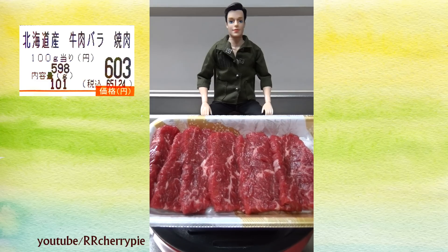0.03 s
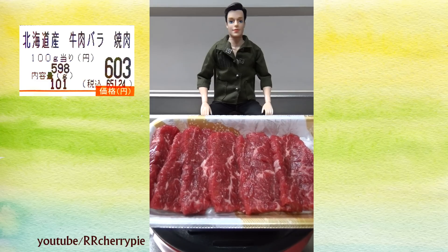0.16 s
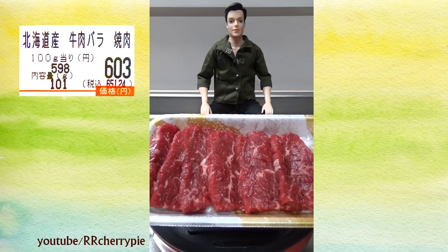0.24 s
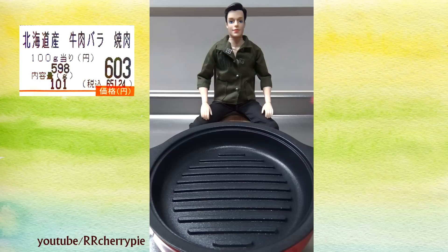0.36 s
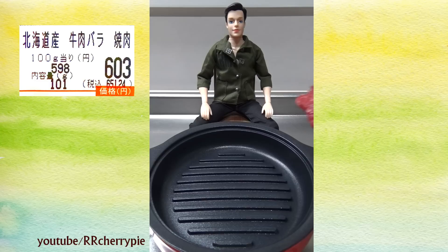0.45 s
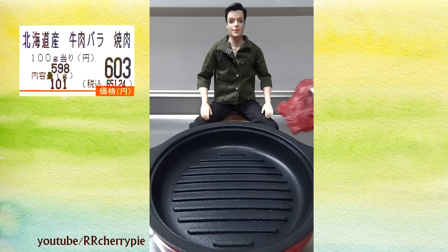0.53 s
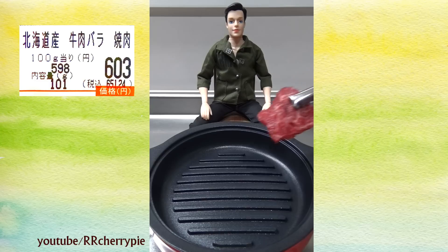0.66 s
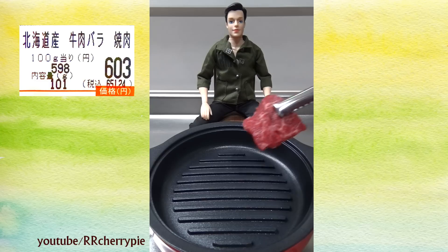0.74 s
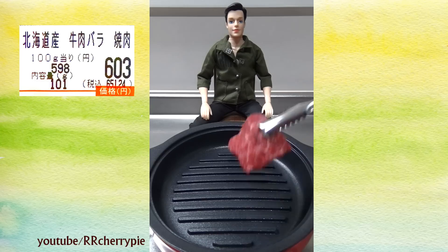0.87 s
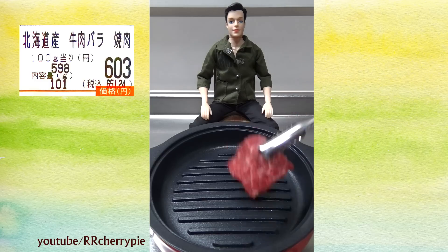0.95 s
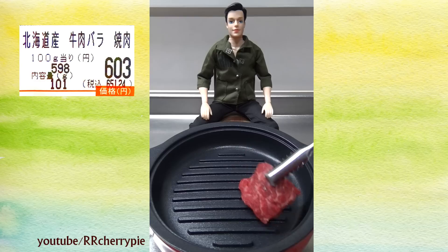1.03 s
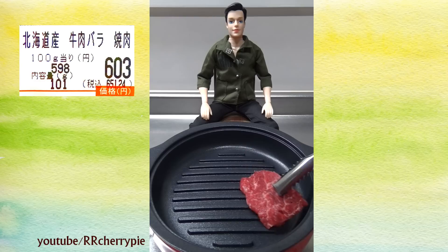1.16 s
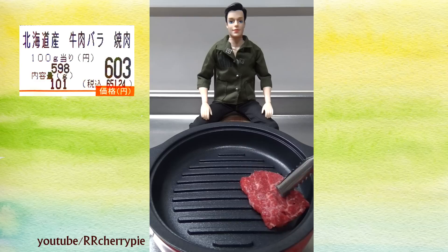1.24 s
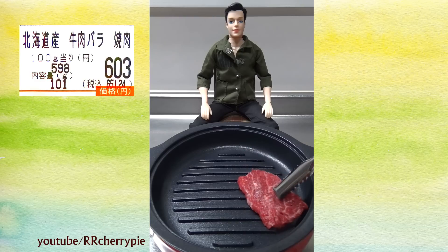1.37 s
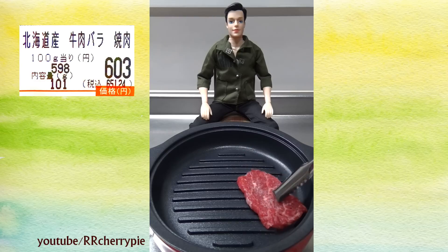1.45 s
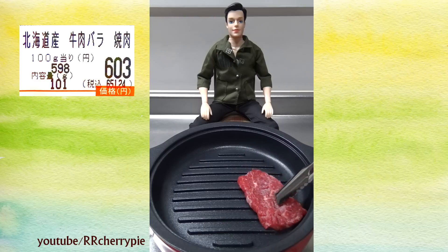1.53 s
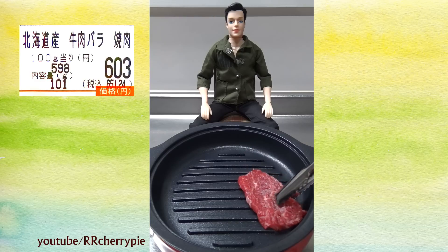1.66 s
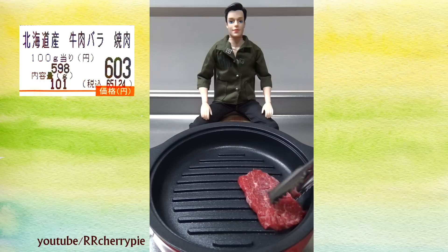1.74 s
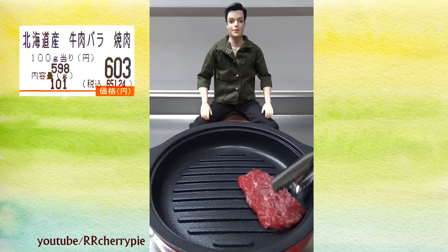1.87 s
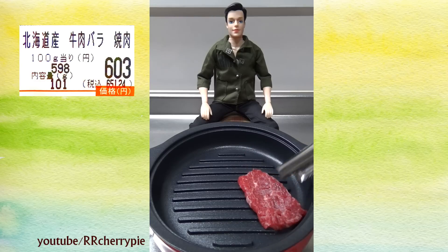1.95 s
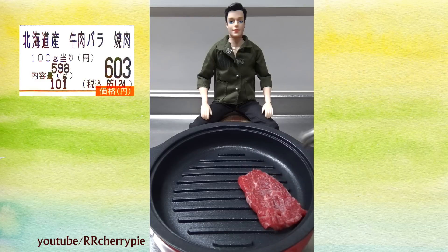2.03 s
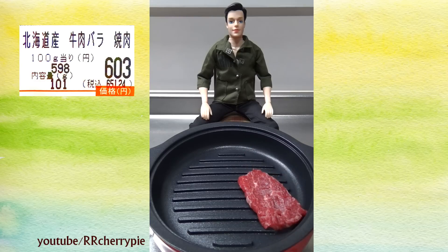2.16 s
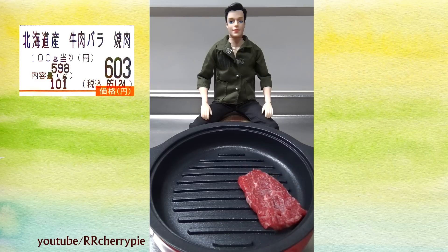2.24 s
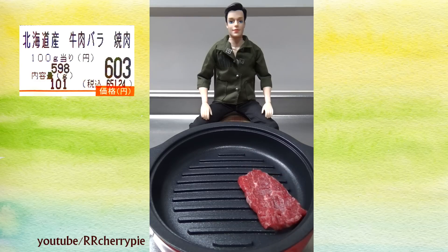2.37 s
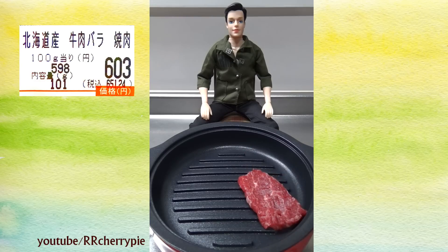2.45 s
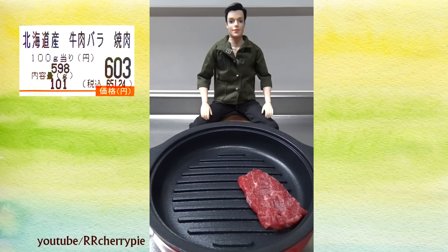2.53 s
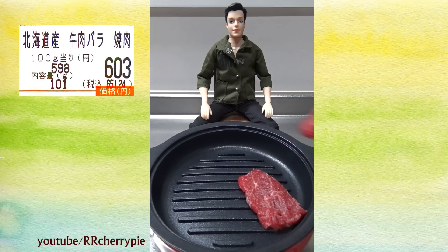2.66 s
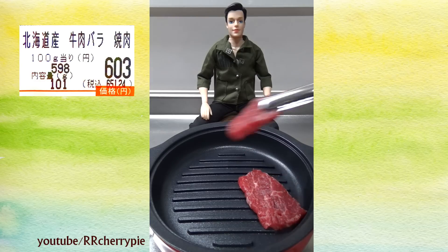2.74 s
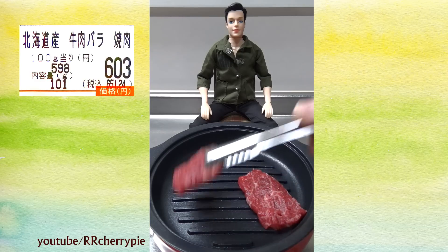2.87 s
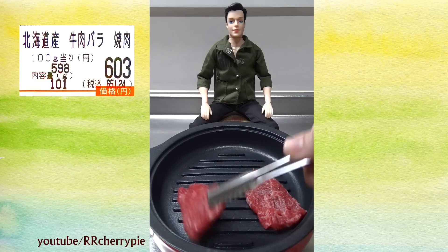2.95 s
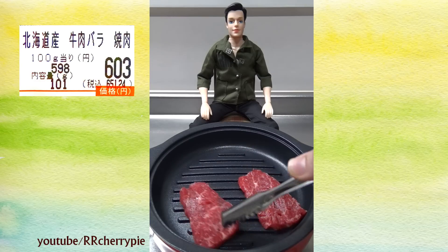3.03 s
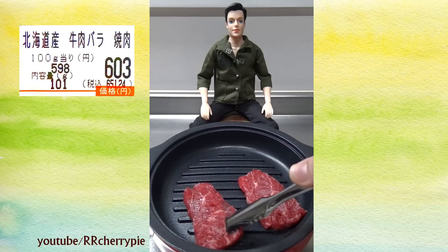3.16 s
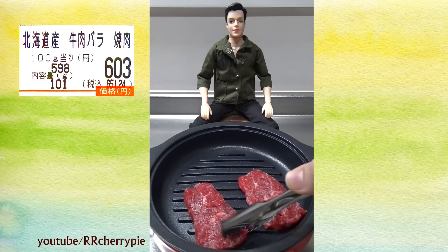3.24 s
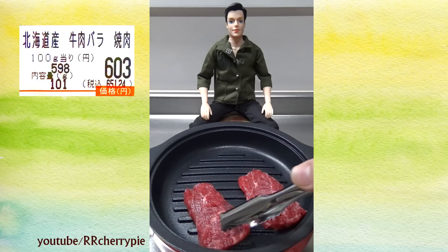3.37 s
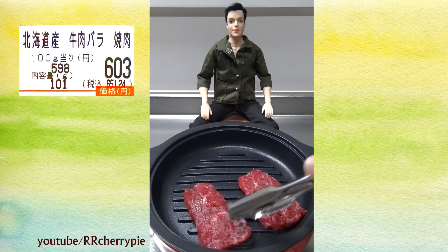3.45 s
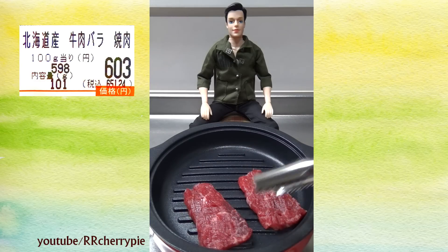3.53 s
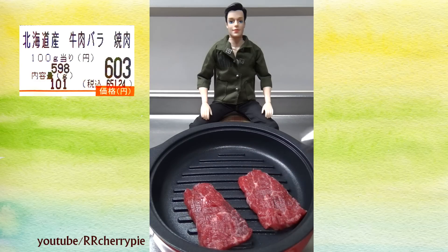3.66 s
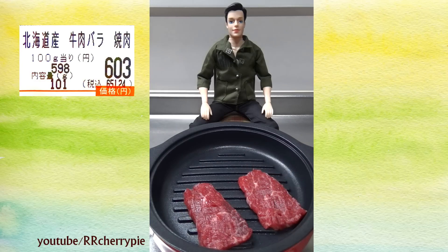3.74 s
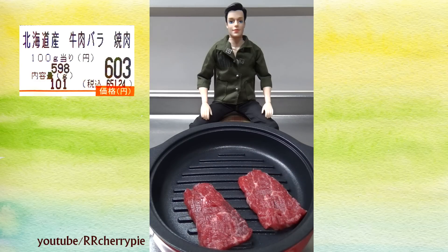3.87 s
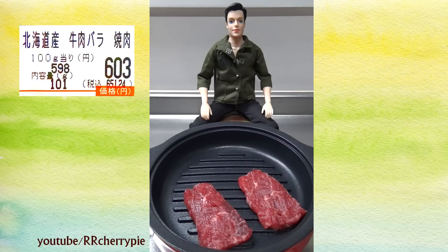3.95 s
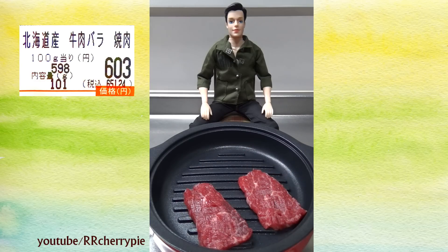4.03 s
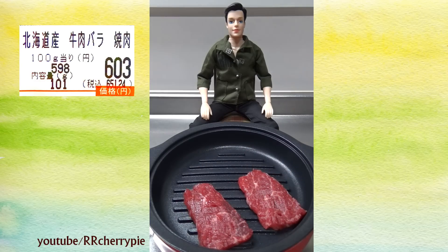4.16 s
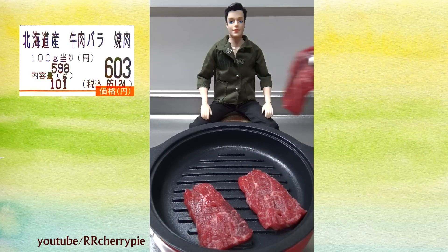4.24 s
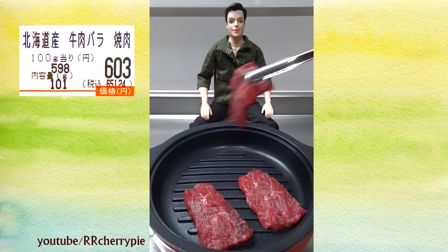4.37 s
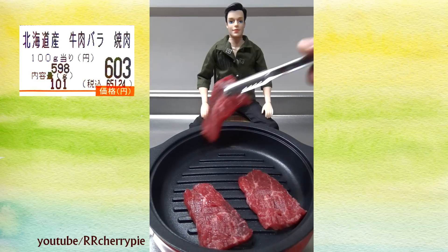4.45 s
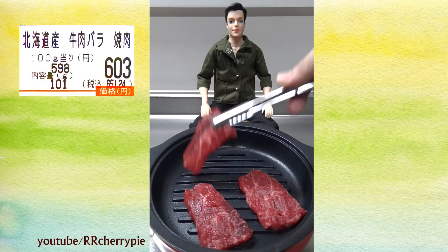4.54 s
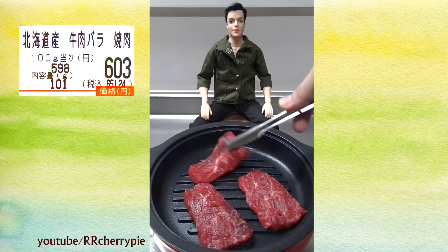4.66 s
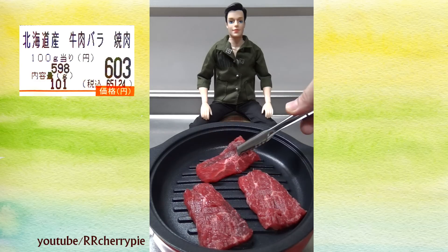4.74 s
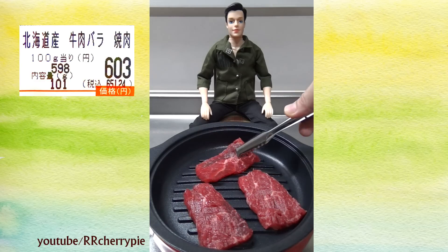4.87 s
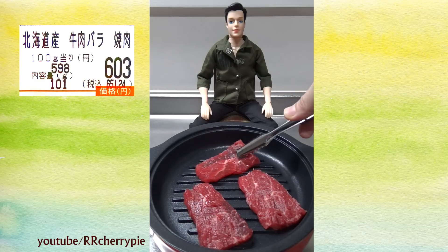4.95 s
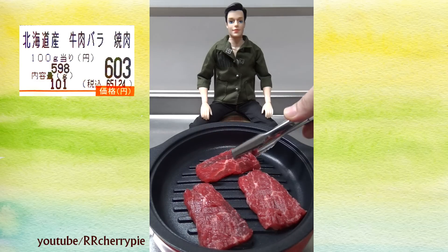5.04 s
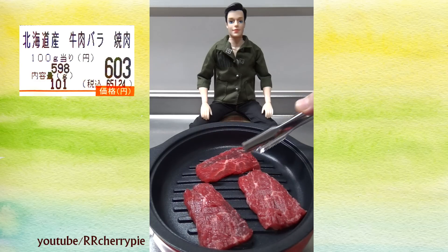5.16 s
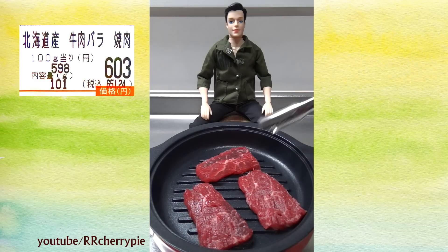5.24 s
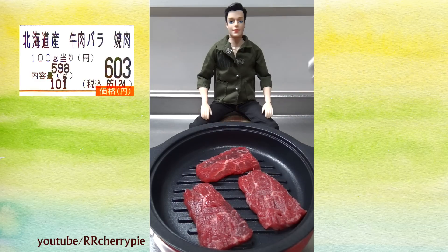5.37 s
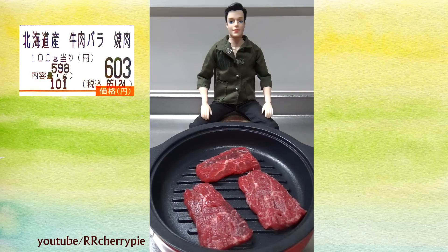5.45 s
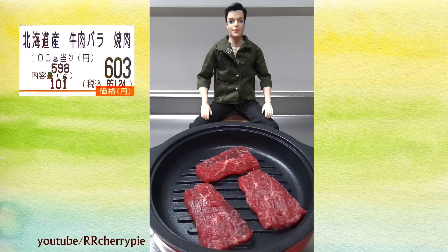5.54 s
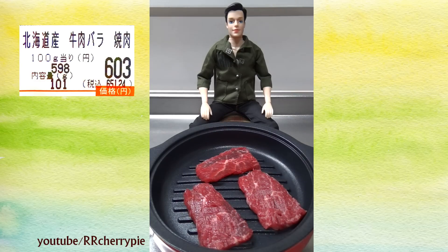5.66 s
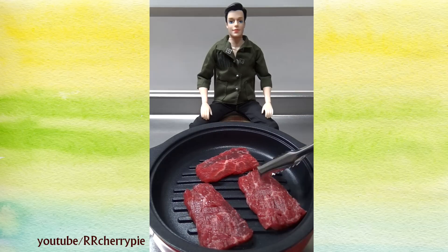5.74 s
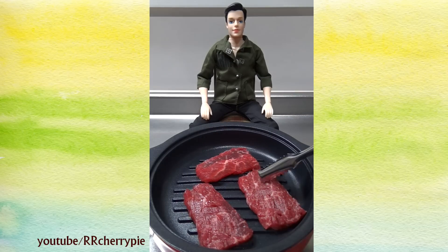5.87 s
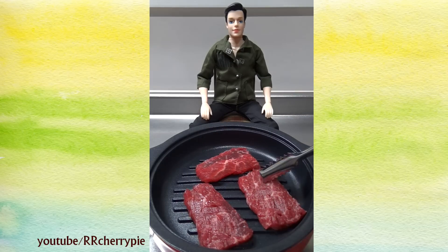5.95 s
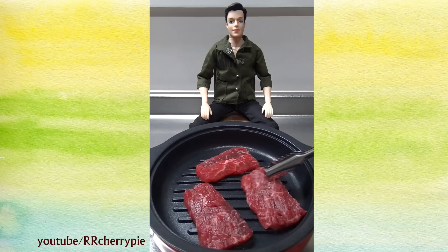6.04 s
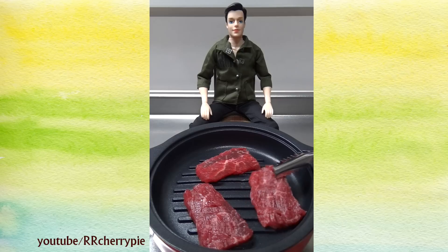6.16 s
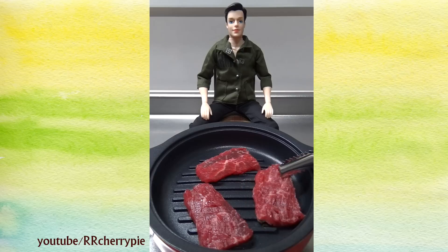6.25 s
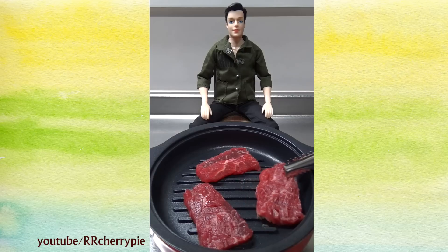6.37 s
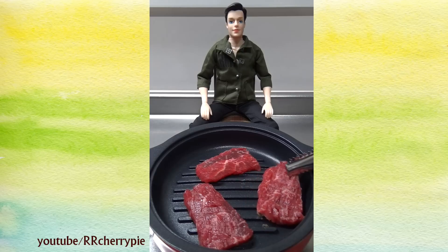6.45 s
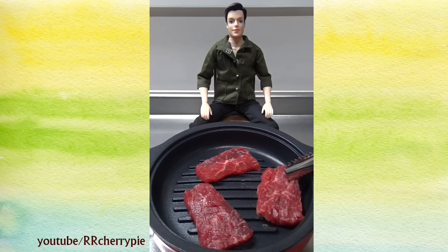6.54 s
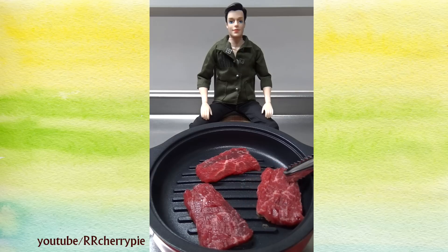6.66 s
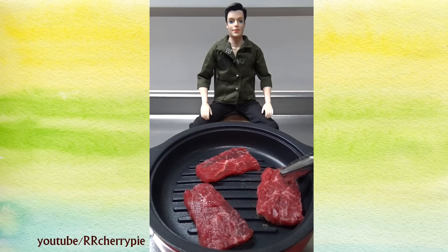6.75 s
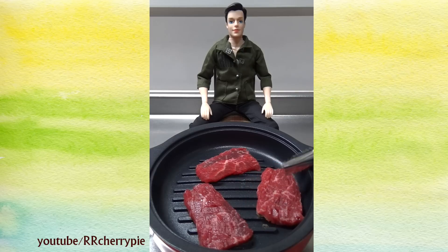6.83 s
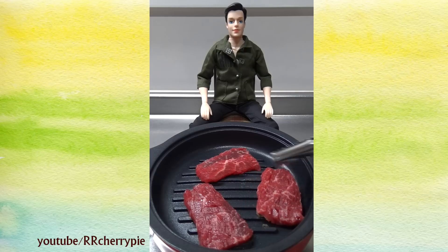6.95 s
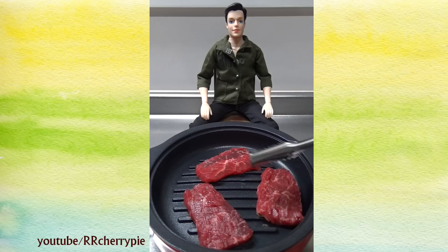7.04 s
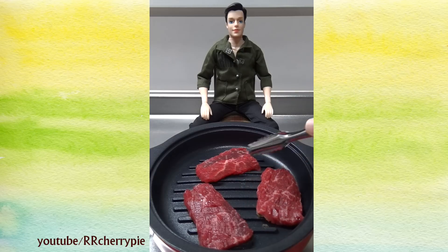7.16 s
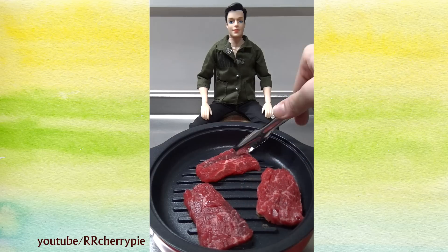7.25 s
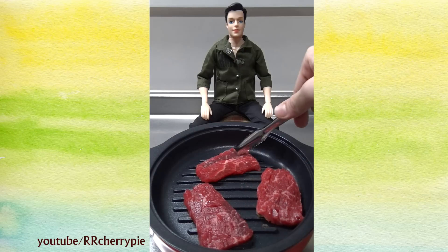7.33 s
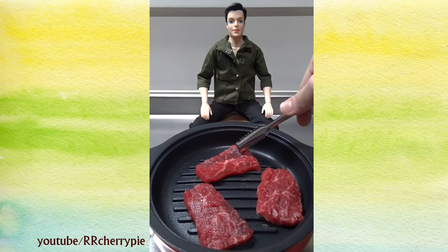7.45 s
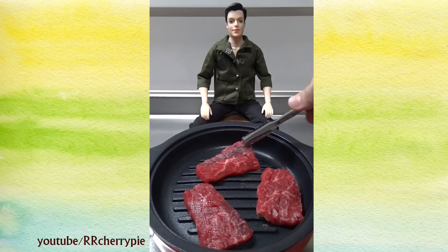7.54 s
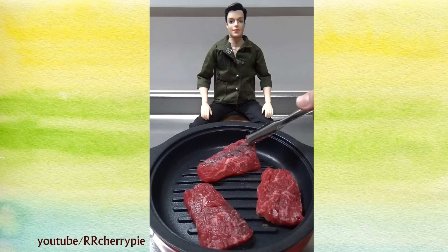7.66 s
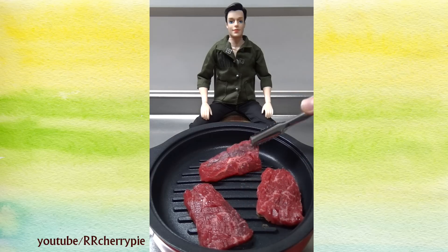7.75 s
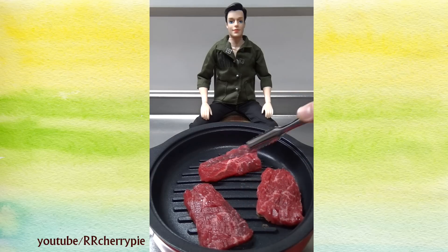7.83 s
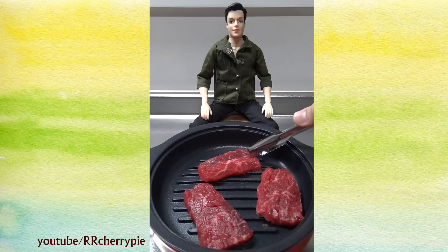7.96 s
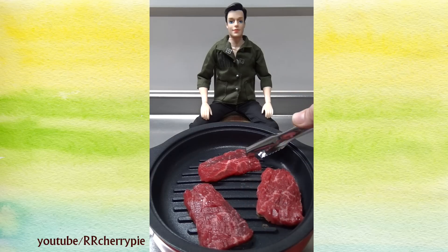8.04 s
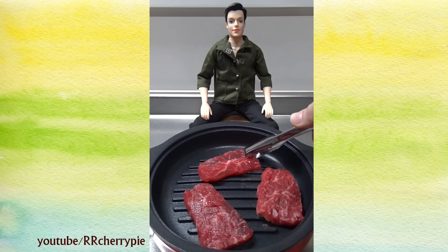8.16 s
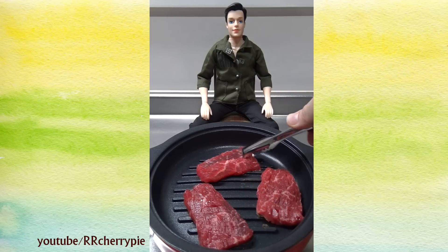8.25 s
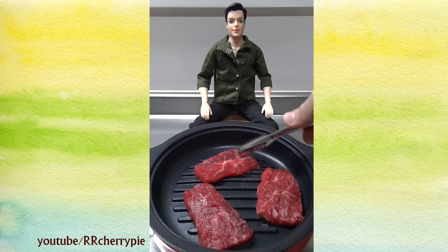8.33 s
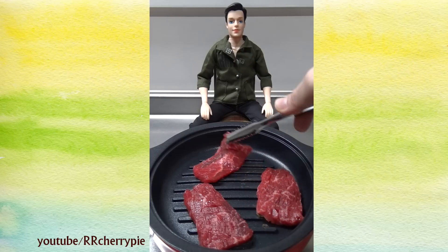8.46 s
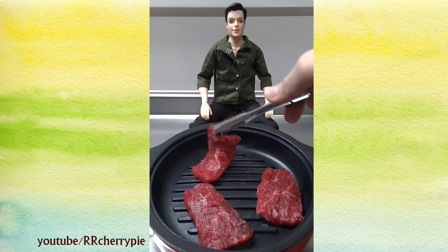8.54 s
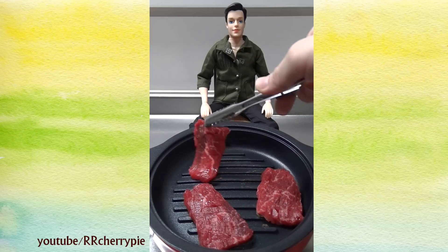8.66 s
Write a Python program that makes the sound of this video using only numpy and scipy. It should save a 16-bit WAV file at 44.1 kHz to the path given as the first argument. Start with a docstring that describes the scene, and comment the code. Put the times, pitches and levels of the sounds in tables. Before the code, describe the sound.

Close and nearly dry, in a small kitchen with a soft droning extractor fan: thin meat slices are laid one by one on a ridged hot pan. The sizzle starts thin and uneven, builds in steps, and stays bright and dense. Thin steam tones sing inside it, fat spits in tiny cracks, tongs click on metal, and moving the meat brings fresh flares, soft bumps and brief high hisses.

```python
"""Thin beef slices on a hot grill pan

Slices of beef sizzle on a ridged pan: tiny random bursts and steam hiss flare up at each contact and fade.
Drifting bands of noise sing as escaping steam, and short pops are spitting fat.
Steel tongs click and make the pan ring in decaying sines; soft bumps are single low pushes.
Behind them a kitchen fan drones in tones and bands of noise, and a short, faint noise tail widens the sound."""
import sys
import numpy as np
from scipy import signal
from scipy.fft import rfft, irfft, next_fast_len
from scipy.io import wavfile
from scipy.ndimage import uniform_filter1d, minimum_filter1d, map_coordinates

SR = 44100
rng = np.random.default_rng(int(sys.argv[2]) if len(sys.argv) > 2 else 0)


def to_wav(sig):
    """Store sig (one row per channel, or 1-D mono) as 16-bit WAV at the path in sys.argv[1].

    Samples outside -1..1 are clipped; the rate is SR.
    """
    pcm = np.clip(np.atleast_2d(sig), -1, 1) * 32767
    pcm = np.round(pcm).astype(np.int16)
    wavfile.write(sys.argv[1], SR, pcm.T)  # frames by channels


N = 383669  # length in samples

# Ways the pan can ring. Each row: pitch in Hz, strength in dB, time to fall by 60 dB in seconds.
PAN_MODES = [(504, 0, 0.089), (634, 3, 0.12), (712, 4.5, 0.13), (771, -5, 0.11), (904, -5, 0.23),
             (1076, -6, 0.22), (1107, -7, 0.41), (1392, 2.5, 0.066), (1495, 2.5, 0.14)]
# How each bubble size boils, large to small. Each row: level in dB, factor that slows the rise,
# drying time in seconds, share of the extra large bubbles from 0 to 1.
BUBBLE_BOILING = [(-6, 2.53, 1.6, 0.77), (-6, 2.35, 6.9, 1), (-1.93, 1.05, 4.1, 0.4), (6, 2.2, 1.89, 0)]


def amp(db):
    """Turn decibels into a gain."""
    return 10 ** (np.asarray(db) / 20)


def unit(x):
    """Scale x to an rms of 1."""
    return x / np.sqrt(np.mean(x ** 2) + 1e-20)


def along(points, hz):
    """Read a curve of (Hz, value) points on a logarithmic pitch axis."""
    point_hz, values = np.transpose(points)
    return np.interp(np.log(hz + 1), np.log(point_hz), values)


def curves(rows):
    """Draw straight lines between the rows: one curve for each column after the time."""
    seconds, *columns = np.transpose(rows)
    t = np.arange(N) / SR
    return [np.interp(t, seconds, column) for column in columns]


def wobble(rate):
    """A smooth random curve through rate random points a second."""
    points = rng.standard_normal(int(N * rate / SR) + 4)
    return map_coordinates(points, [np.arange(N) * rate / SR])


def filtered(x, response):
    """Change the colour of x by a gain that depends on frequency."""
    size = next_fast_len(N + 8192)
    spectrum = rfft(x, size) * response(np.fft.rfftfreq(size, 1 / SR))
    return irfft(spectrum, size)[..., :N]


def band(hz, lo, hi, order=10):
    """Gain of a pass band; the powers of bands side by side add up flat."""
    above_lo = 1 - 1 / (1 + (hz / lo) ** (2 * order))
    return np.sqrt(above_lo / (1 + (hz / hi) ** (2 * order)))


def narrow(pitch_hz, width_hz):
    """Noise of rms 1 around one pitch, which may move: a sine and cosine with slowly random strengths."""
    knots = np.arange(0, N + SR, SR / (3 * width_hz))
    a, b = [np.interp(np.arange(N), knots, v) for v in rng.standard_normal((2, len(knots)))]
    phase = 2 * np.pi * np.cumsum(pitch_hz * np.ones(N)) / SR
    return unit(a * np.cos(phase) + b * np.sin(phase))


def tone(hz, waver):
    """A sine of rms 1 whose phase wanders; waver scales the wander in radians."""
    return unit(np.sin(2 * np.pi * hz * np.arange(N) / SR + waver * wobble(4)))


def ring(modes, t, centre_hz, scatter_db, octaves=.9):
    """A struck object: decaying sines of varied strength, strongest near the pitch the contact favours."""
    hz, db, t60 = np.transpose(modes)[:, :, None]
    strength = amp(db + scatter_db * rng.standard_normal(db.shape))
    gain = strength / (1 + (np.log2(hz / centre_hz) / octaves) ** 2)
    sign = (-1) ** np.arange(len(modes))[:, None]
    decay = amp(-60 * t / t60)
    wave = np.sum(sign * gain * decay * np.sin(2 * np.pi * hz * t), axis=0)
    return wave / np.abs(wave).max()


def add(track, s, sound):
    """Mix a sound into the track at s seconds."""
    part = track[round(s * SR):][:len(sound)]
    part += sound[:len(part)]


def bursts(rate, spread_db):
    """Single-sample clicks at random times, rate a second on average, of varied size; rms 1 overall."""
    fired = rng.random(N) < rate / SR
    sign = np.sign(rng.standard_normal(N))
    size = amp(spread_db * np.clip(rng.standard_normal(N), -2.5, 2.5))
    return unit(fired * sign * size)


def kitchen(air_db=-52, side_db=-8, rush_db=-2.0, rush_hz=305, throb_db=-0.4):
    """A fan's blade tone beats against an electric hum; duct tones and a swelling rush lie over room air."""
    # Colour of the room air. Each row: frequency in Hz, gain in dB.
    air_colour = [(25, -17), (72, -16.5), (100, -5), (128, -31), (170, -3.5), (225, -10), (310, -11),
                  (400, -11.5), (480, -10), (700, -20), (1500, -21.5), (2600, -31.5), (6500, -27.5),
                  (15800, -36.5)]
    # Low hum. Each row: time in seconds, level in dB before the tones' own levels and the throb.
    hum_level = [(0.06, -47), (0.37, -54), (1.25, -46), (1.3, -56.5), (4.69, -49.5), (4.91, -65),
                 (5.2, -46), (5.84, -54.5), (5.91, -39.5), (6.18, -47.5), (7.92, -51.5), (8.04, -42),
                 (8.28, -53), (8.64, -42.5)]
    # Low rush of air. Each row: time in seconds, level in dB before rush_db is added.
    rush_level = [(0.06, -52), (0.85, -50), (0.89, -56.5), (2.24, -52), (2.27, -42.5), (2.59, -61),
                  (2.66, -48.5), (4.26, -53), (4.94, -42.5), (5.33, -53.5), (5.54, -49), (7.12, -54.5),
                  (7.47, -52), (8.4, -49.5)]
    # Tones of the fan and its duct. Each row: pitch in Hz, width in Hz, rms level in dB.
    fan_tones = [(108.6, 12, -55.5), (148.6, 10, -52), (186.4, 18, -56.5), (239.4, 4, -60.5),
                 (298.5, 3, -53), (1272, 3, -65), (1550, 3.7, -74)]
    noise = rng.standard_normal((2, N))
    mid, side = unit(filtered(noise, lambda hz: amp(along(air_colour, hz))))
    blades = amp(-1) * tone(97, waver=0.68)
    mains = amp(-7) * tone(101.1, waver=.35)
    hum = amp(curves(hum_level)[0] + throb_db * wobble(9)) * (blades + mains)
    rush = amp(curves(rush_level)[0] + rush_db) * narrow(rush_hz, width_hz=40)
    drone = sum(amp(db) * narrow(hz, width) for hz, width, db in fan_tones)
    air = amp(air_db) * (mid + amp(side_db) * np.array([side, -side]))
    return hum + rush + drone + air


def stereo_tail(x):
    """Smear x with a short decaying noise that differs left and right and dies at its own pace by pitch."""
    # Each row: frequency in Hz, time for the tail to fall by 60 dB in seconds.
    tail_times = [(200, 0.05), (2000, 0.028), (12000, 0.61)]
    hz, t, z = signal.stft(rng.standard_normal((2, SR // 3)), SR, nperseg=256)
    decay = amp(-60 * t / along(tail_times, hz)[:, None])
    tail = signal.istft(z * decay, SR, nperseg=256)[1]
    return signal.fftconvolve(x[None], tail / np.linalg.norm(tail[0]), axes=1)[:, :N]


def bumps(push_s=0.00087):
    """A soft contact of meat or tongs is one low push with no ring."""
    # Each row: start in seconds, level in dB.
    soft_contacts = [(4.947, -28), (5.716, -38), (7.775, -20.5)]
    out = np.zeros(N)
    u = np.arange(SR // 20) / SR / push_s
    for s, db in soft_contacts:
        add(out, s, amp(db) * (1 - u) * np.exp(-u))
    return out


def tongs(crack_db=-12, crack_t60=0.012, clack_db=-10, clack_t60=.045):
    """The steel tips click with a short crack; the pan gives a hollow clack and rings on."""
    # Tongs meeting the pan. Each row: start in seconds, click level in dB, click centre in Hz,
    # pan ring level in dB, ring centre in Hz.
    taps = [(1.6566, -10, 3960, -29.5, 820), (3.3005, 1, 6000, -26.5, 872), (3.338, -24, 3990, -35, 1000),
            (4.945, -21, 2870, -28.5, 920), (5.0557, 0.5, 4400, -28.5, 640), (6.701, -20, 3500, -26, 760),
            (7.296, -26, 4000, -31, 540), (7.32, -28, 4000, -36, 650), (7.348, -18, 4000, -28, 610),
            (8.075, -12, 3000, -30.5, 680), (8.109, -17, 3500, -22, 910), (8.18, -17, 3000, -28, 517)]
    # Ways the tongs can ring. Each row: pitch in Hz, strength in dB, time to fall by 60 dB in seconds.
    tong_modes = [(2705, -6.5, 0.032), (2990, 0.5, 0.015), (3700, -3, 0.013), (4710, -3, 0.016),
                  (5530, -4.5, 0.014), (7400, -2.5, 0.039), (9000, 0.5, 0.023), (11700, 2, .008)]
    # Band of the pan's hollow clack: low edge in Hz, high edge in Hz.
    clack_band = (600, 1300)
    out, cracks, clacks = np.zeros((3, N))
    t = np.arange(SR // 3) / SR
    for s, click_db, click_hz, pan_db, pan_hz in taps:
        add(out, s, amp(click_db) * ring(tong_modes, t, click_hz, scatter_db=-1.5, octaves=0.82))
        add(out, s, amp(pan_db) * ring(PAN_MODES, t, pan_hz, scatter_db=6, octaves=0.53))
        crack_fade = amp(click_db + crack_db - 60 * t / crack_t60)
        add(cracks, s, crack_fade * rng.standard_normal(len(t)))
        clack_fade = amp(pan_db + clack_db - 60 * t / clack_t60)
        add(clacks, s, clack_fade * rng.standard_normal(len(t)))
    clacks = filtered(clacks, lambda hz: unit(band(hz, *clack_band, order=3)))
    cracks = filtered(cracks, lambda hz: band(hz, 1900, 11000, order=4))
    return out + clacks + cracks


def spits(spit_db=1):
    """A bursting drop of fat gives a sharp crack, a fast-fading mix of a sine and noise."""
    # Each row: start in seconds, peak in dB before spit_db and the filter, pitch in Hz,
    # time to fall by 60 dB in seconds.
    fat_drops = [(1.35, -31, 7500, .008), (1.5171, -22, 6000, 0.0084), (1.9105, -12, 7950, .003),
                 (2.025, -10, 9000, .002), (2.637, -12, 7000, .004), (3.4938, -6, 7000, 0.0039),
                 (3.4963, -16, 6900, .008), (3.6043, -11, 9600, 0.0041), (3.814, -15.5, 1720, .015),
                 (3.9509, -1, 8160, 0.0022), (4.4213, -14, 9070, 0.0025), (4.7642, -5, 8820, 0.0039),
                 (5.7247, -8, 10000, 0.0017), (5.728, -3, 11000, .002), (5.74, -3, 9900, 0.002),
                 (7.7755, -2, 12040, .003)]
    out = np.zeros(N)
    t = np.arange(SR // 40) / SR
    for s, db, pitch_hz, t60 in fat_drops:
        crack = np.sin(2 * np.pi * pitch_hz * t) + .6 * rng.standard_normal(len(t))
        pop = crack * amp(-60 * t / t60)
        add(out, s, amp(db + spit_db) * pop / np.abs(pop).max())
    return filtered(out, lambda hz: band(hz, 2400, 17000, order=2))


def steam(gap_db=-2, jet_db=-0.5):
    """Gaps under the meat resonate, drifting in pitch as slices settle; pressing squeezes out short jets."""
    # Steam under the first and the second slice, one list each. Each row: time in seconds,
    # pitch in Hz before the wobble, level in dB before gap_db and the wobble.
    slice_gaps = [
        [(1.08, 6440, -95), (1.16, 6470, -71), (1.55, 6530, -43), (1.85, 6750, -30), (2.2, 6450, -33),
         (2.62, 6166, -30), (2.95, 5820, -36), (3.3, 5900, -42), (4.5, 5700, -55)],
        [(1.7, 4430, -95), (2.1, 4400, -61), (2.65, 4440, -41), (3.1, 4550, -41), (3.45, 4480, -34),
         (3.75, 4484, -48), (4.3, 4430, -34), (5.3, 4365, -35.5), (5.8, 4450, -48.5)],
    ]
    # Brief jets. Each row: middle in seconds, half length in seconds, pitch in Hz,
    # level in dB before jet_db is added.
    steam_jets = [(1.153, 0.033, 12800, -47), (1.245, .015, 8000, -45), (1.366, .015, 7140, -41),
                  (6.323, 0.11, 7250, -25.5), (6.83, 0.091, 7000, -39), (7.315, 0.076, 7270, -25),
                  (7.563, 0.071, 7400, -24), (7.71, 0.069, 5470, -31), (7.77, 0.066, 7150, -26),
                  (7.95, 0.057, 7440, -28), (8.178, 0.045, 7300, -25), (8.24, 0.044, 7750, -25),
                  (8.363, 0.065, 9460, -24), (8.658, 0.11, 6870, -28)]
    out, t = np.zeros(N), np.arange(N) / SR
    for gap in slice_gaps:
        pitch_hz, level_db = curves(gap)
        singing = narrow(pitch_hz * (1 + .012 * wobble(14)), width_hz=300)
        out += singing * amp(level_db + gap_db + 0.59 * wobble(56))
    for s, half, hz, db in steam_jets:
        swell = np.exp(-((t - s) / half) ** 2)
        out += amp(db + jet_db) * swell * narrow(hz, width_hz=200)
    return out


def boil(size_db, slowness, dry_s, share):
    """Strength of one bubble size: each contact flares up and slowly dries out; at times the level dips."""
    # Wet meat meeting hot metal, as a slice is laid, settles or is pushed along. Each row: start in seconds,
    # level in dB before size_db, rise time in seconds before slowness, extra large bubbles in dB before share.
    contacts = [(1.1, -41, 0.12, -6.5), (1.41, -25.5, 0.58, 1.5), (2.93, -34, .32, 5),
                (3.5, -26.5, .3, -1.2), (4.185, -30.5, .04, 0.6), (4.93, -25, 0.18, -1.5),
                (5.715, -25.5, 0.0074, -1), (6.03, -21.5, 0.15, 1.7), (7.23, -29.2, 0.0067, 2),
                (7.91, -26.5, 0.055, 0.3)]
    # Moments when the sizzle briefly dips. Each row: middle in seconds, half length in seconds,
    # change of level in dB.
    dips = [(3.36, .14, -0.5), (6.547, 0.12, -2), (7.78, 0.056, -1.8), (8.124, 0.018, -3.5),
            (8.682, .26, -0.5)]
    t, power = np.arange(N) / SR, np.zeros(N)
    for s, db, rise_s, large_db in contacts:
        age = np.maximum(t - s, 0)
        rise = 1 - np.exp(-age / (rise_s * slowness))
        drying = np.exp(-age / dry_s)
        power += (amp(db + size_db + share * large_db) * rise * drying) ** 2
    dip_db = sum(db * np.exp(-((t - s) / half) ** 2) for s, half, db in dips)
    return np.sqrt(power) * amp(dip_db)


def pan_drone(ring_db=-18.5):
    """The large bubbles keep the pan faintly ringing, its long-lived pitches most."""
    modes = sum(np.sqrt(t60) * narrow(hz, width_hz=22) for hz, _, t60 in PAN_MODES)
    return amp(ring_db) * unit(modes) * boil(*BUBBLE_BOILING[0])


def pockets(x, depth_db):
    """Pockets under the meat open and close, each raising or lowering a few hundred hertz for a moment."""
    z = signal.stft(x, nperseg=512)[2]
    bins, frames = np.indices(z.shape)
    # a coarse random map, smoothed over pitch and time
    coarse = rng.standard_normal((z.shape[0] // 3 + 2, z.shape[1] // 40 + 2))
    field = map_coordinates(coarse, [bins / 3, frames / 40], order=2)
    return signal.istft(z * amp(depth_db * field), nperseg=512)[1][:N]


def frying(steam_db=-2, crackle_db=-13.0, flurry_db=0.66, patchy_db=0.4, stutter_db=2.0):
    """Tiny bursts and sparser crackles ride on a steam hiss; each bubble size boils at its own strength."""
    # Band of each bubble size, from sputter to fizz. Each row: low edge in Hz, high edge in Hz.
    size_bands = [(600, 3600), (3600, 5500), (5500, 9000), (9000, 17000)]
    # Colour of the frying. Each row: frequency in Hz, gain in dB.
    frying_colour = [(400, -34), (900, -22), (1350, -16.5), (1700, -12), (2400, -11), (2800, -8),
                     (3700, -8), (4350, -1.5), (5400, -3), (6900, 6.5), (9800, 2), (11700, 5), (13200, 2.5),
                     (14200, -0.5), (15800, 0)]
    t = np.arange(N) / SR
    crowd = bursts(rate=14000, spread_db=3) + amp(steam_db) * rng.standard_normal(N)
    crowd = pockets(crowd, depth_db=1.2)
    crowd = crowd * amp(flurry_db * wobble(350))
    crowd = crowd + amp(crackle_db) * bursts(rate=250, spread_db=2.5)
    # uneven at first, while few spots boil
    stutter = stutter_db * np.interp(t, [1.4, 2.3], [1, 0]) * wobble(70.2)
    out = np.zeros(N)
    for size, (lo, hi) in zip(BUBBLE_BOILING, size_bands):
        voice = unit(filtered(crowd, lambda hz: amp(along(frying_colour, hz)) * band(hz, lo, hi)))
        out += voice * boil(*size) * amp(patchy_db * wobble(35))
    return amp(stutter) * out


def scene(tail_db=-15, fan_left_db=0.33):
    """The pan sits slightly to the right, the kitchen drone slightly to the left; a faint stereo tail follows."""
    # How far the pan leans to the left. Each row: frequency in Hz, left minus right in dB.
    left_lean = [(500, -1.2), (1500, -1.9), (4000, -1.6), (8000, -1.4), (12500, -.2)]
    # Tone of the faint stereo tail: brighter near 10 kHz, softer at the very top.
    # Each row: frequency in Hz, gain in dB.
    tail_colour = [(300, -2), (4000, -1), (7000, 2), (10000, 3), (13000, -10)]
    pan = frying() + pan_drone() + steam() + spits() + tongs() + bumps()
    direct = filtered(pan, lambda hz: amp(np.outer([.5, -.5], along(left_lean, hz))))
    tail = filtered(stereo_tail(pan), lambda hz: amp(along(tail_colour, hz)))
    background = kitchen() * amp([[fan_left_db], [-fan_left_db]])
    return direct + amp(tail_db) * tail + background


def record(dry, ceiling=0.74):
    """A limiter ducks briefly around peaks above the ceiling; then all from 15780 Hz up is cut off."""
    need = np.minimum(1, ceiling / (np.abs(dry).max(axis=0) + 1e-9))
    lowest = minimum_filter1d(need, size=441, origin=180)  # hold the lowest gain for 10 ms
    gain = uniform_filter1d(lowest, size=61)
    return filtered(dry * gain, lambda hz: hz < 15780)


dry = scene()
out = record(dry)
to_wav(out)
```